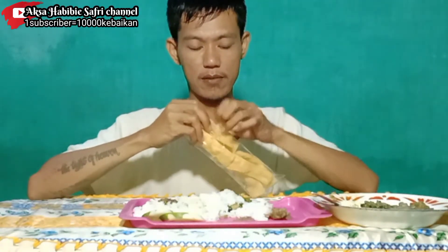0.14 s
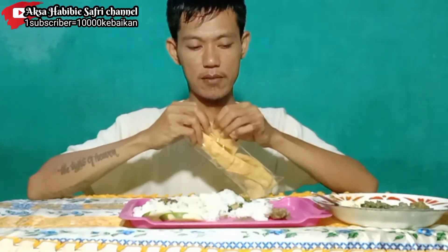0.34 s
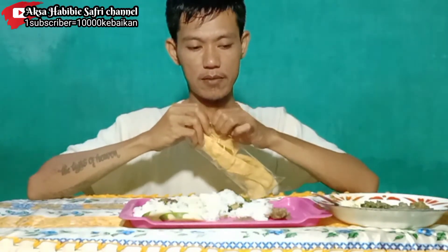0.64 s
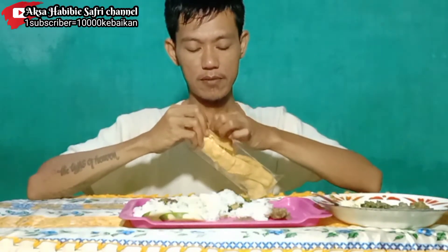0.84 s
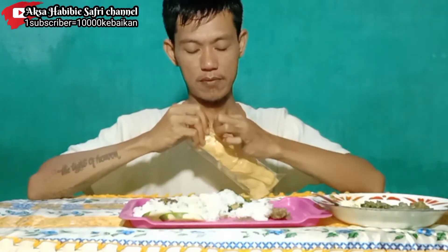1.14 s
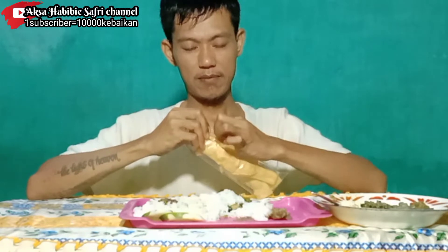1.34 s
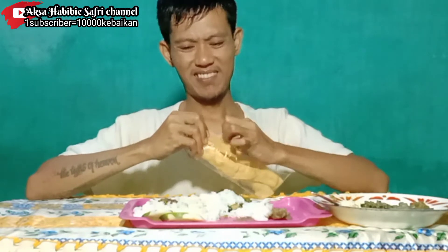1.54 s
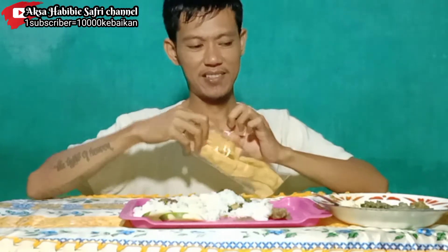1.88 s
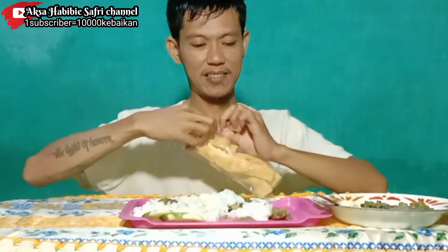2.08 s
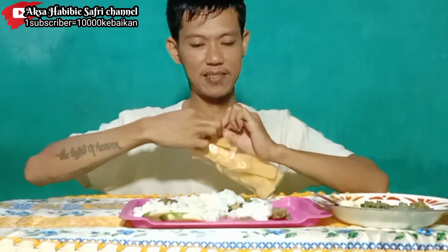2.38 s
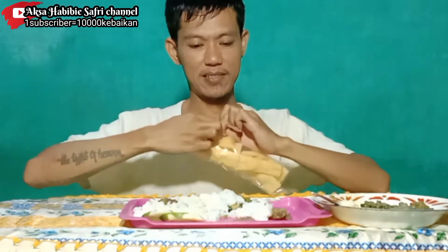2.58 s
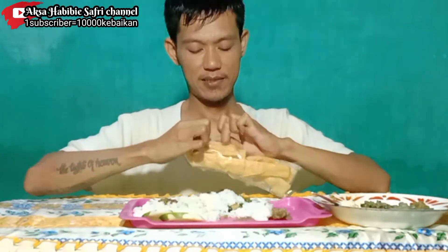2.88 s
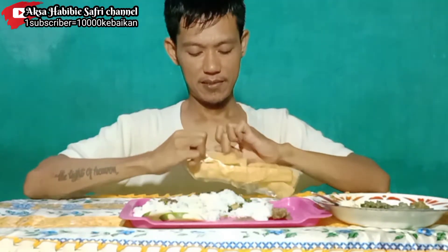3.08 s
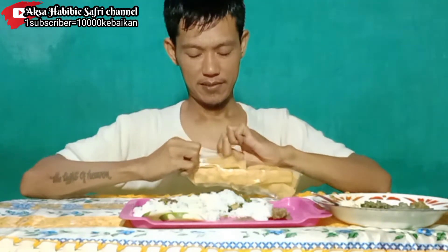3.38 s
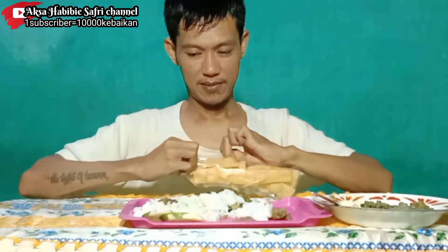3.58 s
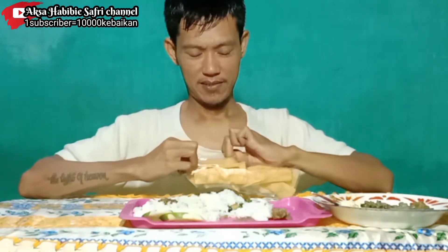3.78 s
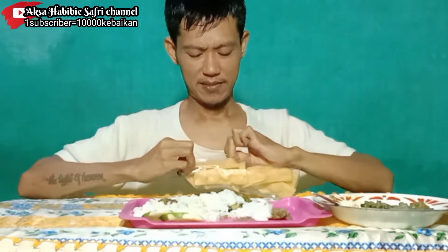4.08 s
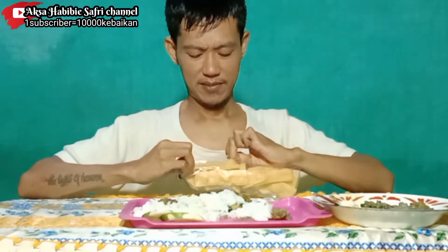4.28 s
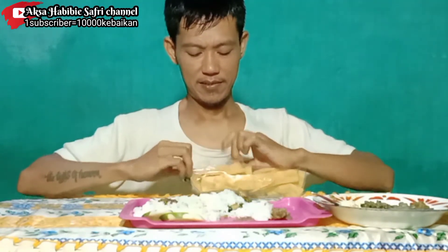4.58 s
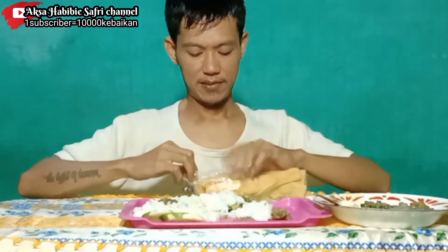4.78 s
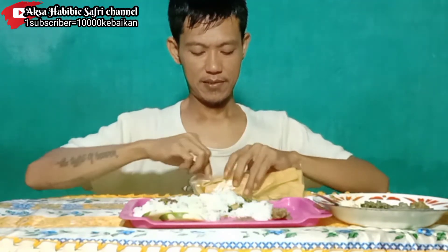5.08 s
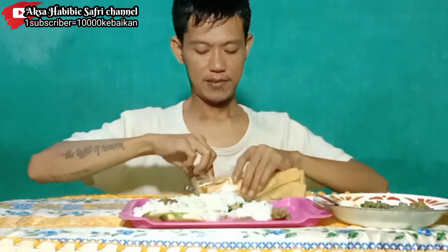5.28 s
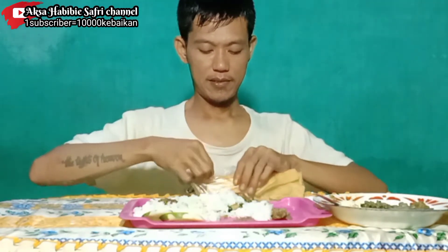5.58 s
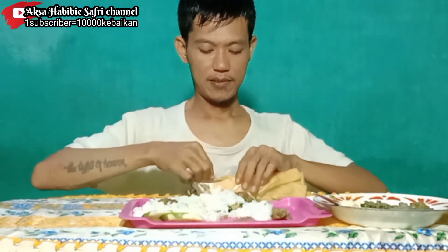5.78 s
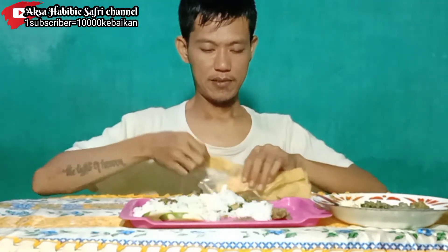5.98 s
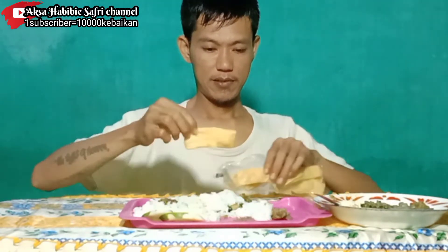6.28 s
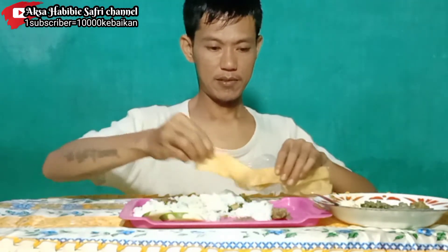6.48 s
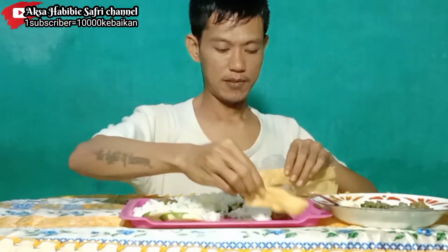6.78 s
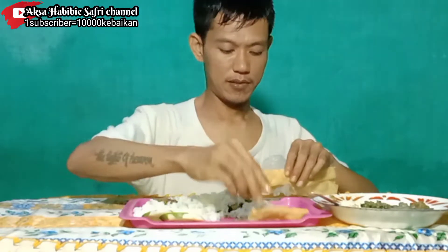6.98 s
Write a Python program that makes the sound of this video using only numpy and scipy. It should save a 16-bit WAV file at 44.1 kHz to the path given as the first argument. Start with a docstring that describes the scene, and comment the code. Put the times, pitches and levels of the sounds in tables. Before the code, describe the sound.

A thin plastic bag of crackers is handled close to the microphone at a table in a small, hard room. From 0 to 0.5 s, bright film snaps and fizzy rustling burst out; a brief lull follows, then the crackling thickens from 0.6 s. At about 1.12 s comes the loudest sharp crack, with a hard cracker knock and a soft low table bump. Strong crinkles continue to 1.8 s. From 2 to 3.7 s the tugs are lighter and irregular, with small snaps, dull cracker rubbing and low bumps near 3 s. Around 4 s it is nearly quiet, then short crinkles return at 4.5-4.8 s and a single snap at 5.2 s. Short grainy friction swells at 5.7 and 6.1 s are crackers sliding out. Faint ticks follow at 6.8 and 7.1 s. Short echoes and thin, wavering hiss lie beneath.

```python
"""A thin plastic bag of crackers is pulled open by hand at a table in a small hard room.
The film snaps in short bright bursts of pings over a rustle of tiny random grains.
Crackers knock as longer, lower pings, rub in dull grains and slide out in swells of friction noise;
soft tones swell and fade, and the bag bumps low table modes. Sparse echoes add the room.
A noise suppressor holds the room hiss down and frays the echo ends; thin hiss bands lie under it."""
import sys
import numpy as np
from scipy import signal
from scipy.io import wavfile
from scipy.ndimage import uniform_filter1d

SR = 44100
rng = np.random.default_rng(int(sys.argv[2]) if len(sys.argv) > 2 else 0)


def materialize(psi):
    """Save the field psi as 16-bit PCM at rate SR to the path in sys.argv[1].

    A 1-D psi becomes a single channel; in a 2-D psi each row is a channel.
    """
    bounded = np.clip(np.atleast_2d(psi).T, -1, 1)
    quanta = np.round(bounded * 32767).astype(np.int16)
    wavfile.write(sys.argv[1], SR, quanta)


N = 314874  # length in samples

# Levels in the tables are set ahead of colouring, echoes and suppressor.
# Room hiss and rumble: (frequency [Hz], density [dB per Hz])
AIR_SPECTRUM = [(18, -52), (30, -19.5), (102, -3), (255, -7), (707, -17), (2290, -10.5), (2610, -18),
                (3960, -19), (15400, -36.5)]
AIR_DB = -66  # rms
# Wavering background hiss bands: (low edge [Hz], high edge [Hz], level [dB], wavering [dB])
HISS_BANDS = [(2165, 2215, -80, 4.), (2290, 2335, -83, 3.5), (7650, 8250, -79.5, 1.5),
              (7650, 10600, -79, 2.), (10600, 15300, -91, 1.)]
# Room decay: (frequency [Hz], t60 [s])
ROOM_DECAY = [(300, 0.34), (800, 0.25), (2000, 0.31), (5500, 0.44), (12000, 0.28)]
# Reflections off the table and the chest: (delay [s], level [dB])
EARLY_REFLECTIONS = [(.0022, -10.5), (.0065, -10)]
# Bag and microphone colour together: (frequency [Hz], density [dB per Hz])
BAG_COLOUR = [(120, -76), (200, -4.5), (345, 3.5), (437, 0), (688, -3.5), (1010, -4), (1230, -4),
              (1710, -1.5), (2120, -8), (2460, -6), (3470, -8), (4000, -11.5), (4390, -17.5), (4800, -11.5),
              (5670, -10.5), (11100, -20), (15400, -20)]
# Air resonances in the bag: (frequency [Hz], width [Hz], level [dB])
AIR_POCKETS = [(705.3, 36, 3.5), (1284, 280, 0), (2112, 150, 2), (2905, 270, -1), (3390, 220, -0.5),
               (5645, 405, -6.5)]
# Low modes of the table: (frequency [Hz], level [dB], t60 [s])
TABLE_MODES = [(109, -6, 0.3), (183, 5, 0.088)]
# The bag bumps the table top: (time [s], level [dB])
TABLE_BUMPS = [(1.146, -45.5), (1.555, -48), (2.977, -43.5), (3.05, -46), (3.527, -50), (3.669, -54),
               (6.104, -53.5)]
# Thin tones as the bag is handled softly: (start [s], length [s], centre pitch [Hz], level [dB])
SOFT_TONES = [(0.436, 0.08, 802, -59.5), (3.332, 0.32, 670, -63.5), (3.605, 0.051, 703, -59),
              (3.52, 0.16, 1417, -57), (4.083, 0.16, 705, -70), (4.249, 0.13, 1335, -65.5),
              (4.658, .1, 709, -57.5), (6.043, .22, 1317, -57.5), (5.322, 0.14, 703, -66),
              (6.774, 0.091, 2317, -64), (6.924, 0.61, 2186, -68), (6.963, 0.14, 1297, -62.5)]
TONE_SPREAD_HZ = 60  # scatter to either side of the centre pitch
# A cracker slides out along the film: (middle [s], half width [s], level [dB], low edge [Hz])
CRACKER_SLIDES = [(5.686, 0.039, -41.5, 402), (6.098, 0.049, -39, 638)]
SLIDE_TILT_DB = 2  # brightening per octave above the low edge
# Crackers knock and crack in the bag: (time [s], level [dB], pitch [Hz])
CRACKER_KNOCKS = [(0.091, -47.5, 707), (0.279, -50, 1476), (0.66, -43, 3670), (0.748, -56, 688),
                  (0.8577, -48, 1023), (1.017, -43.5, 1850), (1.054, -48, 1400), (1.1213, -34, 1172),
                  (1.1215, -26, 3230), (1.238, -41.5, 1193), (1.528, -47, 716), (1.815, -47, 667),
                  (2.315, -57, 702), (2.422, -55.5, 1260), (2.363, -50, 1200), (2.721, -56, 800),
                  (3.039, -46.5, 1335), (3.051, -55.5, 598), (3.514, -46.5, 1470), (3.696, -50, 1870),
                  (3.699, -54, 1080), (4.509, -44, 803), (5.649, -52, 2230), (6.769, -54.5, 3620),
                  (6.772, -65, 1249), (7.119, -48.5, 3040), (7.118, -56, 1026)]
# Fingers tug or squeeze: (full force [s], rise [s], hold [s], film rustle [dB], cracker rub [dB])
FINGER_TUGS = [(0.0, 0.022, 0.0024, -32.5, -44), (0.076, 0.023, 0.024, -35, -50),
               (0.294, 0.12, 0.029, -45, -55.5), (0.443, 0.046, 0.0099, -46, -74),
               (0.643, 0.0044, 0.013, -42, -55.5), (0.782, 0.0055, 0.032, -49, -66.5),
               (0.855, 0.0057, 0.23, -39.5, -49), (1.115, 0.00198, 0.072, -30, -38.5),
               (1.307, 0.046, 0.41, -48.5, -60), (1.522, 0.018, 0.31, -42, -50),
               (1.961, 0.044, 0.038, -42.5, -53), (2.142, 0.094, 0.068, -52, -67.5),
               (2.348, 0.13, 0.034, -47, -57), (2.544, 0.017, 0.18, -50, -60),
               (2.726, 0.029, 0.02, -38, -48.5), (2.88, 0.11, 0.045, -51.5, -64.5),
               (3.03, 0.0044, 0.072, -47.5, -59.5), (3.23, 0.11, 0.057, -47, -59),
               (3.513, 0.0046, 0.0087, -44.5, -56.5), (3.652, 0.022, 0.021, -49, -58.5),
               (4.513, 0.082, 0.01, -45, -53.5), (4.583, 0.0092, 0.015, -41.5, -51),
               (4.728, 0.046, 0.016, -47, -61), (5.076, 0.011, 0.031, -62.5, -71.5),
               (5.197, 0.0026, 0.039, -50.5, -62.5), (5.318, 0.077, 0.085, -59.5, -70.5),
               (5.514, 0.028, 0.18, -50.5, -58.5), (5.746, 0.035, 0.041, -55.5, -61),
               (5.971, 0.005, 0.095, -77.5, -67), (6.767, 0.005, 0.015, -66, -77.5),
               (6.969, 0.0033, 0.062, -92, -73), (7.127, 0.0028, 0.015, -65, -59.5)]
RISE_FROM_DB, SAG_DB_PER_S = -28.5, 17  # level about one rise time early; slackening while held
FILM_FADE_DB_PER_S, RUB_FADE_DB_PER_S = 144, 118  # after letting go
FILM_REST_DB, RUB_REST_DB = -78.5, -77.5  # relaxing film and settling crackers between tugs
SPLIT_HZ = 5140  # border between dull and bright grains
# Creases that buckle audibly: (time [s], body level [dB], fine treble against the body [dB])
FILM_SNAPS = [(0.0912, -24, 4.5), (0.1293, -19.5, 1.5), (0.2776, -24.5, 5), (0.3712, -33.5, 8.5),
              (0.377, -25, -7), (0.43, -23.5, 1), (0.6184, -37, 4), (0.6362, -51, 26.5),
              (0.6594, -29.5, 3.5), (0.7765, -35.5, 11), (0.8245, -37, 5), (0.8445, -30, 4),
              (0.8571, -27.5, 4), (0.9217, -28, 0), (1.0154, -28, 4.5), (1.0208, -22.5, -1),
              (1.0739, -25.5, 0), (1.088, -29, -3), (1.1205, -13, 3.5), (1.1808, -29, -4),
              (1.201, -17, -10), (1.4023, -34.5, 0), (1.4592, -30, -2), (1.5299, -20.5, -34),
              (1.5877, -21, -4), (1.673, -29.5, -10), (1.7631, -29, -3), (1.953, -29.5, 2),
              (2.3075, -46, 11), (2.3322, -30.5, 0), (2.3746, -36.5, -8), (2.426, -38, 8), (2.612, -47, 2),
              (2.663, -33.5, -5), (2.729, -32.5, -3), (2.7445, -27, -2), (2.921, -36, 4),
              (2.9619, -36.5, 12), (3.039, -33, 3.5), (3.1155, -39, 6.5), (3.197, -38.5, 12),
              (3.222, -37.5, 9), (3.253, -30, 2), (3.3324, -35, 4), (3.48, -45, 11), (3.5167, -38.5, 7),
              (3.661, -52, 24), (3.7817, -52.5, 18), (4.2233, -49.5, 17), (4.39, -58, 18.5),
              (4.4927, -57, 26), (4.5115, -35.5, -12), (4.585, -49, -6), (4.59, -38.5, 4.5),
              (4.747, -36, 6), (4.8153, -41.5, 6), (5.1838, -32.5, 5), (5.516, -58, 19),
              (6.771, -43.5, 1.5), (7.1195, -45, 2)]
# Pitches in one snap: (body [Hz], lower fine treble [Hz], upper fine treble [Hz])
SNAP_PITCHES = 5643, 8180, 14190
FINE_ECHO_DB = -16  # fine treble is aimed at the microphone and hardly reaches the walls
EDGE_HZ = 15680  # top of the final low-pass


def gain_of(db):
    """Decibels to amplitude."""
    return 10 ** (np.asarray(db) / 20)


def evened(x):
    """Scales to rms 1."""
    return x / np.sqrt(np.mean(x ** 2) + 1e-20)


def read(points, hz):
    """Reads a curve of (frequency, value) points on a log-frequency axis."""
    f, value = np.transpose(points)
    return np.interp(np.log(hz + 1), np.log(f + 1), value)


def add(mix, s, sound):
    """Mixes a sound in at time s."""
    part = mix[max(round(s * SR), 0):][:len(sound)]
    part += sound[:len(part)]


def drift(rate, count=24):
    """Random wander from sines of up to rate Hz, near rms 1 with its tall peaks clipped."""
    t = np.arange(0, N + 64, 64) / SR
    slow = 0
    for f in np.geomspace(rate / 6, rate, count):
        slow = slow + np.sin(2 * np.pi * (f * t + rng.random())) / np.sqrt(f)
    return np.interp(np.arange(N) / SR, t, np.clip(evened(slow), -2.5, 1.3))


def coloured(x, points):
    """Minimum-phase filter with the given spectrum, mean power gain 1."""
    density_db = read(points, abs(np.fft.fftfreq(8192, 1 / SR)))
    log_gain = np.log(gain_of(np.maximum(density_db, -80)))
    taps = np.fft.ifft(np.exp(np.conj(signal.hilbert(log_gain)))).real[:3000]
    return signal.oaconvolve(x, taps / np.linalg.norm(taps))[:N]


def ping(hz, cycles):
    """A small patch flicks over: a soft start and a few cycles of ring, peak near 1."""
    turns = np.arange(round(12 * cycles * SR / hz) + 2) * hz / SR
    return np.sin(2 * np.pi * turns) * turns / cycles * np.exp(1 - turns / cycles)


def burst(out_len, db, hz, chance, cycles, spread_s, octaves):
    """A first ping and a quick run of slips, weaker as they come later and scattered in pitch."""
    out = np.zeros(out_len)
    add(out, 0, gain_of(db) * ping(hz, cycles))
    for late, weak, high in chance:
        slip = ping(hz * 2 ** (octaves * (high - .5)), cycles)
        add(out, spread_s * late, gain_of(db - 5 * late - 8 * weak) * slip)
    return out


def grains(lo_hz, hi_hz, per_s, spread_db, cycles, clumps, patchy_db, count=18):
    """Random pings of many pitches; they come in clumps, and each pitch comes and goes."""
    loudness = gain_of(spread_db * np.minimum(rng.exponential(1, N), 2.8))
    size = loudness * (rng.random(N) < per_s / SR)
    patch, out = rng.integers(0, count, N), np.zeros(N)
    for k, hz in enumerate(np.geomspace(lo_hz, hi_hz, count)):
        shape = ping(hz, cycles)
        train = size * (patch == k) * gain_of(patchy_db * drift(13, count=12))
        out += signal.oaconvolve(train, shape / np.linalg.norm(shape) * np.sqrt(hz))[:N]
    return evened(out * clumps)


def air():
    """Steady hiss and rumble of the room, as filtered noise."""
    return gain_of(AIR_DB) * coloured(rng.standard_normal(N), AIR_SPECTRUM)


def whine():
    """Narrow and wide bands of noise that waver a little."""
    out = np.zeros(N)
    for lo_hz, hi_hz, db, waver_db in HISS_BANDS:
        band = signal.butter(6, [lo_hz, hi_hz], "band", fs=SR, output="sos")
        hiss = evened(signal.sosfilt(band, rng.standard_normal(N)))
        out += gain_of(db + waver_db * drift(1.3)) * hiss
    return out


def room(x):
    """Sparse echoes of random sign, each band dying at its own speed; three tails take turns."""
    taps = np.zeros((3, SR // 2))
    at = np.arange(130, SR // 2 - 20, 16)
    echo_shape = (3, len(at))
    places = at + rng.integers(0, 16, echo_shape)
    np.put_along_axis(taps, places, rng.choice([-1., 1.], echo_shape), 1)
    hz, t, z = signal.stft(taps, SR, nperseg=256)
    decay = gain_of(-60 * t / read(ROOM_DECAY, hz)[:, None])
    tails = signal.istft(z * decay, SR, nperseg=256)[1]
    turn = np.pi * (np.arange(N) / SR * 3 + np.arange(3)[:, None] / 3)
    fed = x * np.cos(turn) * np.sqrt(2 / 3)  # constant total power
    return signal.fftconvolve(fed, tails / np.linalg.norm(tails[0]), axes=1)[:, :N].sum(0)


def early(x):
    """Direct sound and the first few reflections, as delayed copies."""
    out = x.copy()
    for s, db in EARLY_REFLECTIONS:
        add(out, s, gain_of(db) * x)
    return out


def hollow(x):
    """The air pockets of the bag ring on a little after each dull sound."""
    out = gain_of(-2.0) * x
    for hz, width, db in AIR_POCKETS:
        out = out + gain_of(db) * signal.lfilter(*signal.iirpeak(hz, hz / width, SR), x)
    return out


def bumps():
    """Soft knocks ring the low modes of the table as decaying sines."""
    out, t = np.zeros(N), np.arange(SR // 3) / SR
    knock = sum(gain_of(db - 60 * t / t60) * np.sin(2 * np.pi * hz * t) for hz, db, t60 in TABLE_MODES)
    soft_start = 1 - np.exp(-t / 0.027)
    for s, db in TABLE_BUMPS:
        add(out, s, gain_of(db) * knock * soft_start)
    return out


def tones():
    """Each tone is a rough cluster of close sines, with a quick swell and a slower end."""
    out = np.zeros(N)
    for (s, length, hz, db), chance in zip(SOFT_TONES, rng.random((len(SOFT_TONES), 9, 2))):
        t = np.arange(0, length, 1 / SR)
        beat = 0
        for off, phase in chance:
            pitch = hz + TONE_SPREAD_HZ * (2 * off - 1)
            beat = beat + np.sin(2 * np.pi * (pitch * t + phase))
        swell = np.sqrt(np.sin(np.pi * (t / length) ** .5))
        add(out, s, gain_of(db) * evened(beat) * swell)
    return out


def slides():
    """A swell of dense friction: very many tiny slips of uneven size."""
    t, out = np.arange(N) / SR, np.zeros(N)
    for s, width, db, low_hz in CRACKER_SLIDES:
        slips = evened(rng.standard_normal(N) * gain_of(7.0 * rng.standard_normal(N)))
        # the tilt runs over four octaves
        tilt = [(low_hz / 2, -30), (low_hz, 0), (16 * low_hz, 4 * SLIDE_TILT_DB)]
        swell = np.exp(-.5 * abs((t - s) / width) ** 3.0)
        out += gain_of(db + 0.66 * drift(90)) * swell * coloured(slips, tilt)
    return out


def knocks():
    """Hollow crackers ring a little longer and lower than the film."""
    out = np.zeros(N)
    for (s, db, hz), chance in zip(CRACKER_KNOCKS, rng.random((len(CRACKER_KNOCKS), 6, 3))):
        add(out, s, burst(3000, db, hz, chance, cycles=2.56, spread_s=0.008, octaves=0.55))
    return out


def tugged(levels_db, fade_db_per_s):
    """Level of a layer: every tug swells, holds and fades by the same rule; powers add."""
    t, power = np.arange(0, N + 64, 64) / SR, 1e-14
    for (s, rise, hold, *_), db in zip(FINGER_TUGS, levels_db):
        corners = [-2 * rise - 1e-3, 0, hold + 1e-3]
        shape_db = np.interp(t - s, corners, [2 * RISE_FROM_DB, 0, -SAG_DB_PER_S * hold])
        fade_db = fade_db_per_s * np.maximum(t - s - hold, 0)
        power = power + gain_of(db + shape_db - fade_db) ** 2 * (t > s - 2 * rise)
    return np.interp(np.arange(N) / SR, t, np.sqrt(power))


def rustle():
    """Fine creases fizz in the treble; rubbing crackers fill the middle."""
    *_, film_db, rub_db = np.transpose(FINGER_TUGS)
    clumps = gain_of(3.04 * drift(40))  # film and crackers move together
    film = grains(SPLIT_HZ, 13400, per_s=1000, spread_db=0.5, cycles=0.75, clumps=clumps, patchy_db=5.0)
    rub = grains(526.8, SPLIT_HZ, per_s=3000, spread_db=3.0, cycles=1.6, clumps=clumps,
                 patchy_db=4.2, count=30)
    film_level = tugged(film_db, FILM_FADE_DB_PER_S) + gain_of(FILM_REST_DB)
    rub_level = tugged(rub_db, RUB_FADE_DB_PER_S) + gain_of(RUB_REST_DB)
    return film_level * film + rub_level * rub


def snaps():
    """Creases of the film let go in bright clicks: a body and its fine treble."""
    body, fine = np.zeros((2, N))
    for (s, db, fine_db), chance in zip(FILM_SNAPS, rng.random((len(FILM_SNAPS), 3, 3, 3))):
        part_levels = db, db + fine_db, db + fine_db - 4.0
        for out, hz, part_db, slips in zip((body, fine, fine), SNAP_PITCHES, part_levels, chance):
            add(out, s, burst(800, part_db, hz, slips, cycles=0.93, spread_s=0.0027, octaves=0.12))
    return coloured(body, BAG_COLOUR), coloured(fine, BAG_COLOUR)


def scene():
    """Bag sounds direct and through the room; the fine treble of the creases stays nearly dry."""
    bag = gain_of(-1.5) * coloured(hollow(rustle() + slides() + knocks()), BAG_COLOUR)
    body, fine = snaps()
    echoes = room(gain_of(-2.5) * bag + gain_of(-3.5) * body + gain_of(FINE_ECHO_DB) * fine)
    return (early(bag + body + fine) + echoes + tones() + bumps() + air())[None]


def record(dry):
    """The suppressor lowers bins near their usual quiet level; hiss bands and a low-pass follow."""
    z = signal.stft(dry[0], nperseg=1024, noverlap=768)[2]
    across_pitch = uniform_filter1d(abs(z) ** 2, size=3, axis=0)
    power = uniform_filter1d(across_pitch, size=7, axis=1) + 1e-20
    quiet = np.percentile(power, 8, axis=1, keepdims=True)
    # share of power kept; the square root below limits the cut to 9 dB
    keep = np.maximum(1 - gain_of(14) * quiet / power, gain_of(-18))
    clean = signal.istft(z * np.sqrt(keep), nperseg=1024, noverlap=768)[1][:N] + whine()
    edge = signal.firwin(401, EDGE_HZ, window=("kaiser", 5), fs=SR)
    return signal.oaconvolve(clean, edge, "same")[None] - gain_of(-75.5)  # steady converter offset


dry = scene()
out = record(dry)
materialize(out)
```